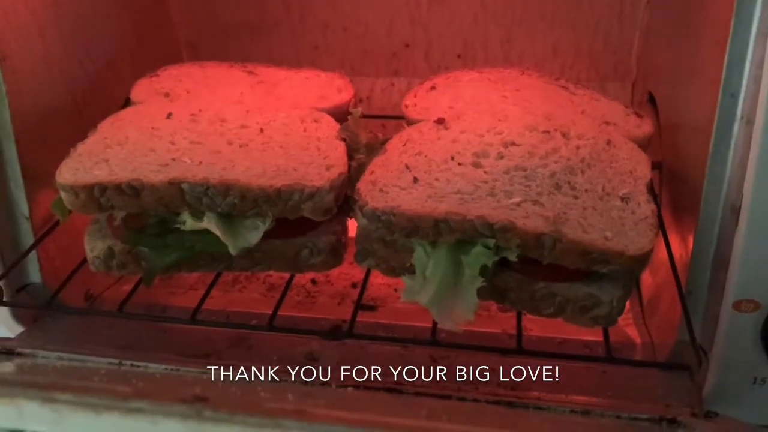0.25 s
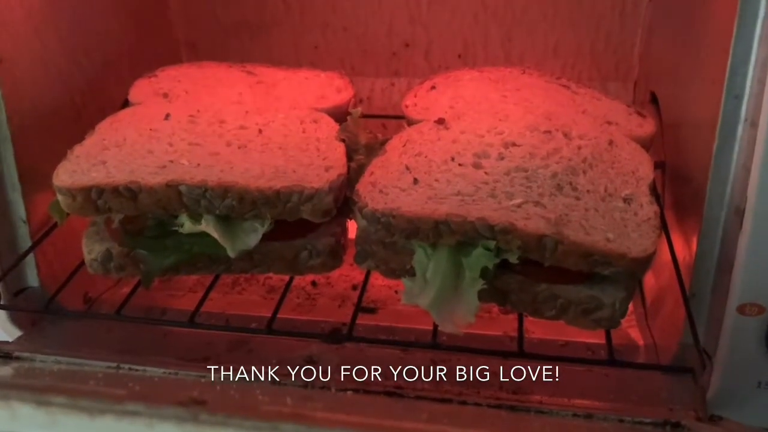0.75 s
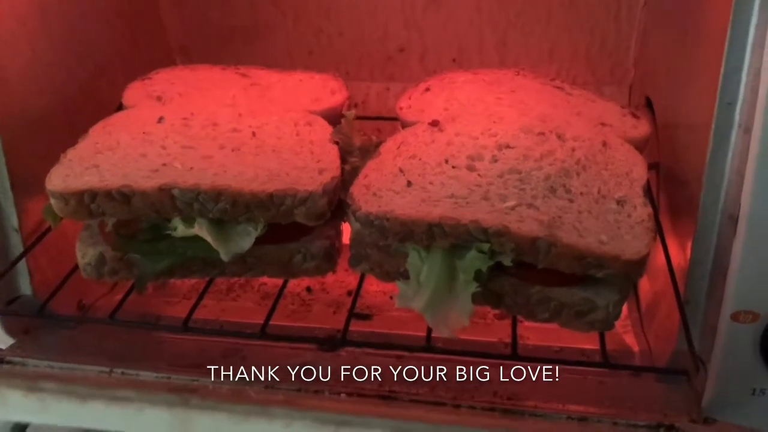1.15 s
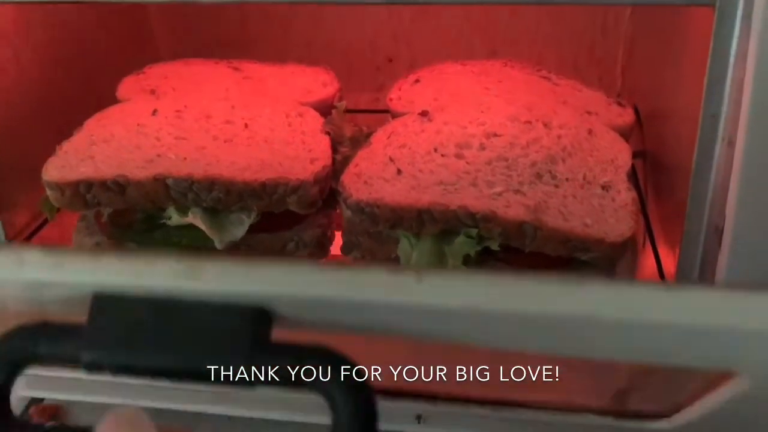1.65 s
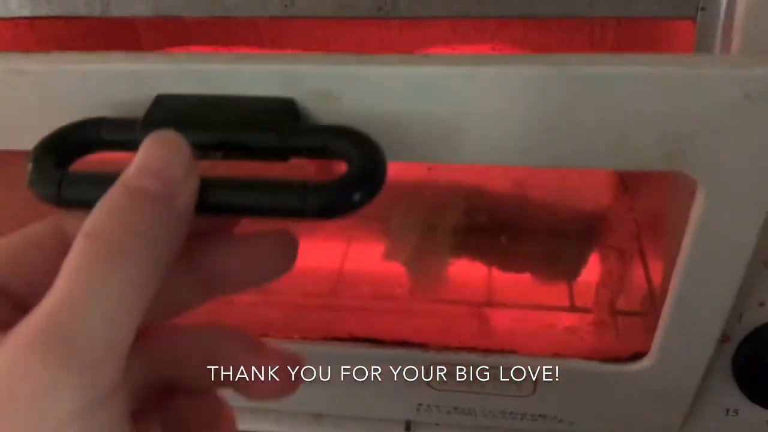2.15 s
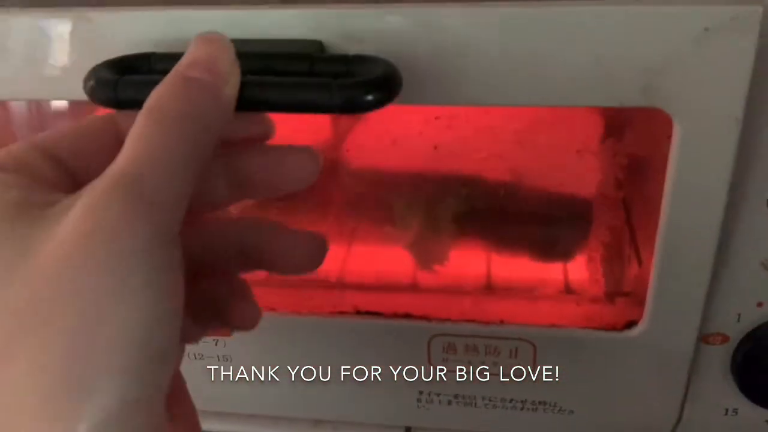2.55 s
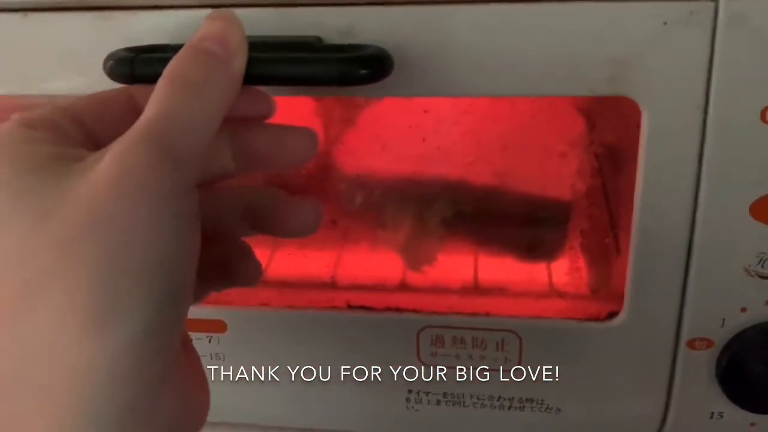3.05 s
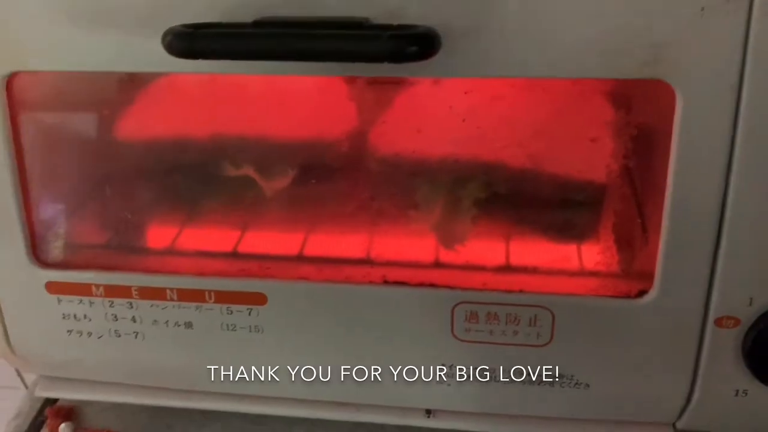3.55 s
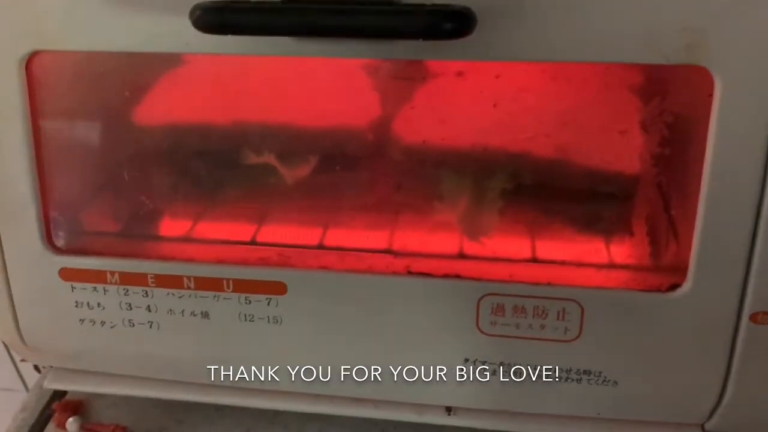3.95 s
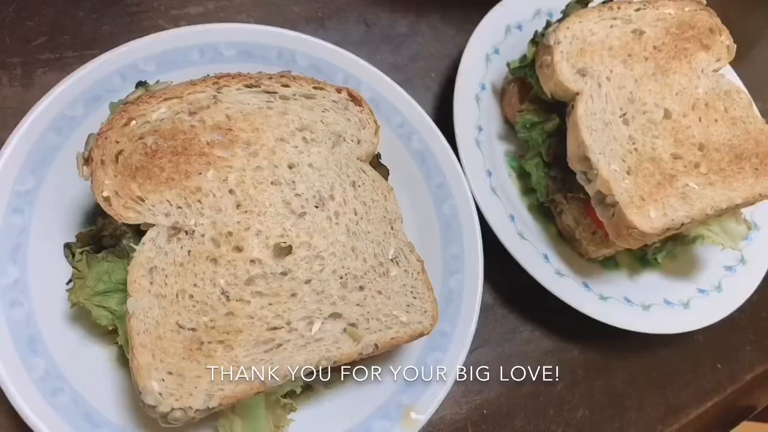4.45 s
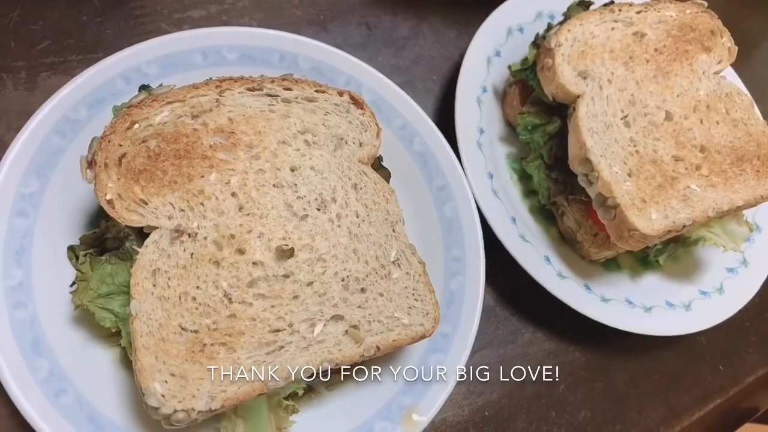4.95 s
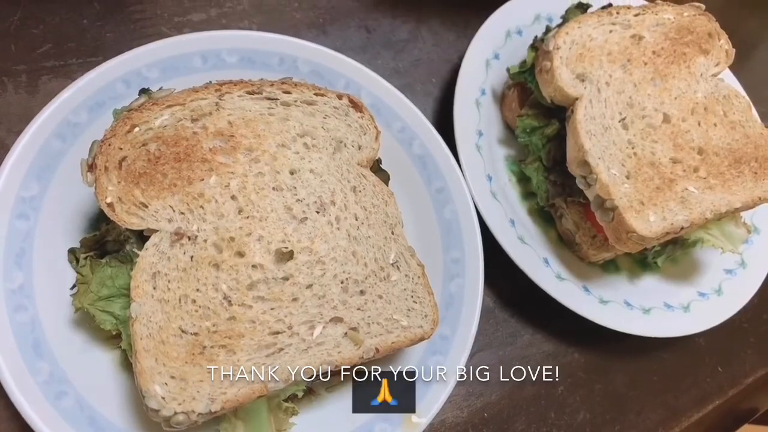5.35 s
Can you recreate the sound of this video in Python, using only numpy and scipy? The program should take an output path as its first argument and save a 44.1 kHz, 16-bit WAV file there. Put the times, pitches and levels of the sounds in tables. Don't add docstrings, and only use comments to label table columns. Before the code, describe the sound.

From the start, a wind-up timer ticks evenly inside a toaster oven, a beat about every 0.21 seconds. Each tick is a tiny cluster of hard contacts, bright and rattly, with a short tinny ring from the sheet-metal case; strong and weak beats alternate in colour. The close stereo pickup also holds soft low kitchen tone and a faint motor hum. A slight touch of the door comes near 2.8 s, then it shuts at 3.0 s with a dull bump, brief frame shudder and small knocks until 3.2 s. Ticking continues unchanged. A low, downward-gliding thud travels through the counter at 3.8 s, with a shorter one near 4.3 s. At 4.35 s everything cuts to a very brief silence, then a quiet mono dining room: low rumble, air, hiss settling lower. Distant crockery clinks at 4.55 and 4.75 s, with a tiny click, then a dull knock at 4.87 s; only room noise remains until about 5.6 s.

```python
import sys
import numpy as np
from scipy import signal
from scipy.fft import rfft, irfft, next_fast_len
from scipy.io import wavfile
from scipy.ndimage import uniform_filter1d

SR = 44100
rng = np.random.default_rng(int(sys.argv[2]) if len(sys.argv) > 2 else 0)


def ratio(d):
    e = np.asarray(d, float) / 20
    return 10 ** e


def transcribe(signal):
    frames = np.atleast_2d(signal).T
    limited = np.clip(frames, -1, 1)
    pcm = np.round(limited * 32767).astype(np.int16)
    wavfile.write(sys.argv[1], SR, pcm)


N = 246341
T = np.arange(N) / SR
KITCHEN_END_S, DINING_START_S = 4.3525, 4.3904

# t/s, peak level/dB, low body re peak/dB, treble re peak/dB
BEATS = [(0.003, -31.5, -11.5, -12), (0.2112, -32.5, -13, -9), (0.4223, -33.5, -11, -10),
         (0.634, -35, -11, -6), (0.8478, -35, -6, -12), (1.061, -35.5, -14.5, -6.5), (1.276, -32, -12, -10),
         (1.487, -34.5, -12, -4.5), (1.7, -30.5, -12.5, -13), (1.91, -32.5, -14, -7.5),
         (2.121, -34.5, -7.5, -12.5), (2.3315, -34, -11, -8.5), (2.5451, -33, -9, -17),
         (2.756, -34.5, -16, -8), (2.974, -32.5, -8, -10.5), (3.185, -34.5, -16.5, -3),
         (3.3953, -34.5, -8, -10.5), (3.606, -35.5, -12, -3), (3.8144, -35, -9.5, -15.5),
         (4.0256, -36, -11.5, -8), (4.2384, -33.5, -10.5, -13.5)]
BEAT_S, PEAK_DB, LOW_DB, TREBLE_DB = np.transpose(BEATS)
IS_WEAK = np.arange(len(BEAT_S)) % 2


def blow_db(hz):
    corners = np.log([1500, 5000, 9000, 13600])
    tilt = np.array([np.interp(np.log(hz), corners, [low, 0, 0, treble])
                     for low, treble in zip(LOW_DB, TREBLE_DB)])
    usual = np.where(IS_WEAK, np.mean(tilt[1::2]), np.mean(tilt[::2]))
    return PEAK_DB + tilt - usual


CONTACT_DB = [
    [2.5, -4.5, -1, -1, -2.5],
    [0.88, -4, -12.5, -16.5, -32],
]
CHATTER_S = [0.0085, 0.008]


def escapement():
    shape = (len(BEAT_S), 5)
    steps = [0, 0.3, 0.65, 1, 1.6] + rng.uniform(-0.12, 0.12, shape)
    contacts = BEAT_S[:, None] + 0.003 + np.array(CHATTER_S)[IS_WEAK, None] * steps
    spread_db = [0, 2.2, 2.2, 2.2, 2.2] * rng.standard_normal(shape)
    rebound = ratio(np.array(CONTACT_DB)[IS_WEAK] + spread_db)
    rebound /= np.sqrt(np.sum(rebound ** 2, axis=1, keepdims=True))
    return contacts, rebound


# f/Hz, level/dB per Hz
STRONG = [(300, -14), (420, -14), (560, -11), (800, -7.5), (1100, -13), (1700, -8), (2500, -11.5),
          (3300, -11.5), (4700, -18), (6500, -8), (9000, -7), (11500, -10), (14000, -4.5), (16200, -43.5)]
# f/Hz, level/dB per Hz
WEAK = [(300, -9.5), (420, -21.5), (560, -9), (800, -13.5), (1100, -18), (1700, -13.5), (2500, -17.5),
        (3300, -18), (4700, -23), (6500, -15), (9000, -13), (11500, -19), (14000, -10.5), (16200, -48)]
# f/Hz, t60/s
PANEL_T60 = [(300, 0.26), (800, 0.22), (2100, 0.22), (5500, 0.12), (9000, 0.073), (14600, 0.057)]
# lead t/s, level re beat/dB
UNLOCK = [(0.026, -26), (0.026, -23.5)]
LEAD_S, UNLOCK_DB = np.array(UNLOCK)[IS_WEAK].T


def panel_ringing(contacts, rebound):
    out = np.zeros((2, N))
    edges = 300 * 2 ** (np.arange(19) / 3)
    white = rng.standard_normal((2, 2, N))
    grit = ratio(2.22 * rms_one(band(rng.standard_normal(N), 31, 700)))
    for k, (low, high) in enumerate(zip(edges, np.minimum(edges[1:], 17000))):
        hz = np.sqrt(low * high)
        t60 = at_hz(PANEL_T60, hz)
        kind_db = np.where(IS_WEAK, at_hz(WEAK, hz) + 12, at_hz(STRONG, hz) + 9)
        level = ratio(blow_db(hz) + kind_db - 2.35 * (hz < 3000))
        level *= ratio(2.2 * rng.standard_normal(len(BEAT_S)))
        hits = train(contacts, level[:, None] * rebound)
        body = ratio(-7) * fade(hits, t60)
        body += ratio(-3.5) * fade(hits, 0.014)
        body += ratio(-23) * fade(hits, 2.54 * t60)
        slide_db = UNLOCK_DB - 17.5 * max(np.log2(hz / 6000), 0)
        slide = (level * ratio(slide_db))[1:]
        body += fade(train(BEAT_S[1:] - LEAD_S[1:], slide), 0.58)
        body += fade(train(BEAT_S[1:] - 0.004, level[1:] * ratio(-23.5)), 0.15)
        swell = np.exp(-2 * np.pi * 16 * (hz / 1000) ** 1.5 / SR)
        body = signal.lfilter([1 - swell], [1, -swell], body)
        first, second = band(white[k % 2], low, high)
        out += body * grit ** np.clip(hz / 8000, 0, 1) * paired(first, second, hz)
    return out


# f/Hz, strong-beat level/dB, weak-beat level/dB, t60/s
CASE_MODES = [(393.5, -24.5, -17.5, 0.55), (448, -15.5, -23, 0.43), (531.6, -10, -9.5, 0.19),
              (591, -18.5, -28, 0.64), (590, -22, -7.5, 0.35), (700, -34, -57, 0.49),
              (800, -22.5, -32, 0.45), (832.6, -10, -19.5, 0.31), (927, -29, -27, 0.81),
              (1046.6, -9, -9.5, 0.26), (1089.4, -9, -46, 0.36), (1192, -9, -13.5, 0.27),
              (1260, -9.5, -14, 0.33), (1190, -33, -42.5, 0.1), (1520, -55, -80, 0.13),
              (1640, -9.5, -12, 0.19), (1745, -27, -9, 0.27), (1747, -5, -30, 0.27), (1860, -21, -64, 0.37),
              (2145, -21, -10, 0.11), (2222, -6, -13, 0.21), (2280, -16, -60, 0.2), (2660, -39, -37, 0.6),
              (3170, -11, -13, .2), (3410, -33, -11, 0.19), (4600, -9, -13, 0.15), (6760, 2, 2.5, 0.028)]


def case_modes(contacts, rebound):
    out = np.zeros((2, N))
    times = np.column_stack([BEAT_S - LEAD_S + 0.0055, contacts])
    heights = np.column_stack([ratio(UNLOCK_DB + 3) * (BEAT_S > LEAD_S), rebound])

    def strike(level, hz, t60):
        uneven = rng.uniform(0.44, 1, level.shape) * rng.choice([-1, 1], level.shape)
        return ring(train(times, level * uneven), hz, t60)

    for hz, strong_db, weak_db, t60 in CASE_MODES:
        mode_db = np.where(IS_WEAK, weak_db, strong_db) - 9
        level = ratio(blow_db(hz) + mode_db)[:, None] * heights
        for twin_hz in hz * (1 + 0.01195 * np.array([-1, 1])):
            first, second = strike(level, twin_hz, t60), strike(level, twin_hz, t60)
            out += paired(first, second, hz)
    return out


def wheel_rings(contacts, rebound):
    out = np.zeros(N)
    for hz in 4800 * 3.2 ** rng.random(44):
        uneven_db = 6.7 * rng.standard_normal(len(BEAT_S))
        level = ratio(blow_db(hz) - 23.5 + uneven_db)[:, None] * rebound
        phase = rng.uniform(0, 7.94, level.shape)
        out += ring(train(contacts, level * np.cos(phase)), hz, 520 / hz)
    return out


def timer():
    contacts, rebound = escapement()
    out = panel_ringing(contacts, rebound) + case_modes(contacts, rebound)
    return out + wheel_rings(contacts, rebound)


# t/s, level/dB, rise/dB per s, hold/s, fall/dB per s
SHUDDER = [
    (2.773, -50.5, 189, .002, 108),
    (3.015, -33, 3000, 0.0022, 195),
    (3.123, -59, 402, 0.018, 250),
    (3.175, -48.5, 400, .035, 133),
]


def frame_shudder(grains):
    shake = np.zeros(N)
    for s, db, rise, hold, fall in SHUDDER:
        before = np.maximum(s - T, 0)
        after = np.maximum(T - s - hold, 0)
        shake += ratio(db - rise * before - fall * after)
    return ratio(-5.0) * shake * rms_one(band(band(grains, 81, 410), 109, 700))


# t/s, peak level/dB, lowest f/Hz, contact cut-off f/Hz
BUMPS = [
    (3.0087, -32.5, 870, 5900),
    (3.012, -26.5, 91, 626),
    (3.040, -37.5, 202, 920),
    (3.126, -44, 90, 700),
    (3.181, -40.5, 89, 600),
    (3.197, -48, 90, 800),
]
# f/Hz, level/dB, t60/s
DOOR_MODES = [(150, -4, 0.084), (212, -8, 0.13), (285, 6.5, 0.041), (342, -5.5, 0.076), (446, -9, 0.092),
              (556, -8.5, .12), (800, -11.5, 0.3), (859, -9, 0.29), (973, -5.5, 0.2), (1230, -4, 0.084),
              (1477, 7.5, 0.053), (1860, 10.5, 0.029), (1875, 1, 0.1), (2160, -2, 0.1), (3066, 2, 0.042),
              (4740, 1, .04)]


def door_bumps():
    out = np.zeros(N)
    rattle = band(rng.standard_normal(N), 310, 5900)
    for s, peak_db, low_hz, cut_hz in BUMPS:
        hit = train([s], ratio(peak_db))
        rings = (ratio(-2) * fade(hit, 0.034) + ratio(-20) * fade(hit, 0.7)) * rattle
        for hz, db, t60 in DOOR_MODES:
            height = ratio(db - 3.0 + rng.uniform(-3.5, 0.62)) * rng.choice([-1, 1])
            rings += ring(hit * height, hz, t60)
        out += band(rings, low_hz, cut_hz)
    return out


# t/s, peak level/dB, first f/Hz, last f/Hz, t60/s
THUDS = [
    (3.82, -41, 230, 60, 0.28),
    (4.267, -53, 208, 138, 0.19),
    (4.295, -43.5, 192, 150, 0.072),
]


def counter_thuds(grains):
    out = np.zeros(N)
    rough = 0.3 * rms_one(band(grains, 76, 520))
    for s, peak_db, first_hz, last_hz, t60 in THUDS:
        age = np.maximum(T - s, 0)
        started = T > s
        hz = last_hz + (first_hz - last_hz) * np.exp(-age / 0.0202)
        wave = np.sin(2 * np.pi * np.cumsum(hz * started) / SR) + rough
        out += ratio(peak_db - 60 * age / t60) * started * wave
    return out


def door():
    grains = rng.standard_normal(N) * (rng.random(N) < 1500 / SR)
    return frame_shudder(grains) + door_bumps() + counter_thuds(grains)


# t/s, peak level/dB
SNAPS = [
    (3.123, -61),
    (4.759, -48),
]


def snaps():
    s, db = np.transpose(SNAPS)
    return fade(train(s, ratio(db)), 0.03) * band(rng.standard_normal(N), 4500, 10600)


# f/Hz, level/dB per Hz
KITCHEN = [(20, -72), (32, -9), (50, 3.5), (130, 1.5), (250, -7.5), (450, -17.5), (800, -26), (1400, -25.5),
           (2500, -43.5), (4000, -51), (6000, -37.5), (9000, -42), (12000, -35.5), (14500, -50)]
# f/Hz, width/Hz, level/dB
MOTOR = [
    (86.76, 3.4, -60.5),
    (176.3, 18, -75.5),
]


def kitchen():
    first, second = coloured(KITCHEN, channels=2)
    dull = signal.butter(3, 8000, fs=SR, output="sos")
    second = signal.sosfilt(dull, second) + 0.087 * second
    tone = ratio(-62) * (first + 0.36 * second * [[1], [-1]])
    return tone + sum(ratio(db) * hum(hz, width_hz) for hz, width_hz, db in MOTOR)


# (f/Hz, level/dB, t60/s)
CLINKS = [
    (4.557, -45.5, 1300, [(970, -12, 0.12), (2120, -11.5, 0.29), (2145, -10, .34), (2660, -19, .4), (2700, -14, 0.17)]),
    (4.74, -53, 2800, [(1420, 1, 0.09), (1690, 3, .06), (2100, -8, .15), (2490, -3, 0.099)]),
    (4.761, -58, 2560, [(1455, 3, .35), (1510, 0, .35), (1780, -1, .3), (2000, -2, .1), (2220, 0, .1), (2420, 0, .1), (2750, -8, .08)]),
    (4.868, -51.5, 1500, [(420, 0, .1), (800, 0, .1), (1850, -9, .1)]),
]


def crockery():
    out = np.zeros(N)
    tail = band(rng.standard_normal(N), 270, 2800)
    for s, peak_db, top_hz, modes in CLINKS:
        hit = train([s], ratio(peak_db))
        out += sum(ring(hit * ratio(db), hz, t60) for hz, db, t60 in modes)
        out += ratio(9.0) * fade(hit, 0.31) * band(tail, 260, top_hz)
    return out


# t/s, level/dB
RUMBLE = [(4.39, -46.5), (4.438, -52), (4.476, -48), (4.562, -53), (4.62, -50), (5.11, -51.5), (5.218, -55),
          (5.286, -49), (5.586, -51.5)]
# f/Hz, level/dB per Hz
AIR = [(35, -26), (60, -17), (75, -6), (335, -11.5), (530, -22), (557, -21.5), (650, -21.5), (1060, -28.5),
       (1350, -29), (3500, -38.5), (4550, -69), (7700, -120)]
# f/Hz, level/dB per Hz
HISS = [(1500, -6.5), (2500, -6), (4400, -14), (6600, -10), (9000, -14.5), (12500, -24), (15600, -25),
        (16300, -52)]


def dining_room():
    rumble = ratio(np.interp(T, *np.transpose(RUMBLE))) * hum(46.9, width_hz=11.2)
    air = ratio(-54) * coloured(AIR, channels=1)[0]
    settle = np.exp(-np.maximum(T - DINING_START_S, 0) / 0.081)
    hiss = ratio(-65.5 + 7.5 * settle) * coloured(HISS, channels=1)[0]
    return rumble + air + hiss + crockery()


# f/Hz, share/0-1
LIKENESS = [(60, .9), (300, 0.7), (1000, 0.52), (3000, 0.16), (6000, 0.41), (9000, 1), (11600, 0.93),
            (14000, 1), (16200, 1)]


def paired(first, second, hz):
    alike = np.clip(at_hz(LIKENESS, hz), 0, 1)
    common = np.sqrt(1 + alike) * first
    opposed = np.sqrt(1 - alike) * second * [[1], [-1]]
    return (common + opposed) / np.sqrt(2)


# f/Hz, lag/rad
CHANNEL_LAG = [(0, 0), (690, .15), (1500, 1.5), (2750, 1.6), (4400, -.4), (5400, -3.4), (6700, -3.3),
               (9300, 0), (11250, 2.8), (12200, 3.4), (14000, 6.28), (15500, 8.6)]
# f/Hz, left re right/dB
CHANNEL_SHADE = [(60, -1), (180, -0.5), (550, 1), (1650, -1), (4970, -2.5), (15000, 1)]


def stereo_phase(x):
    size = next_fast_len(N + 999)
    hz = np.fft.rfftfreq(size, 1 / SR)
    shade = ratio(at_hz(CHANNEL_SHADE, np.maximum(hz, 1)) / 2)
    half = shade * np.exp(-0.5j * np.interp(hz, *np.transpose(CHANNEL_LAG)))
    return irfft(rfft(x, size) * [half, 1 / half], size)[:, :N]


def train(times, heights):
    clicks = np.full(N, 1e-18)
    index = np.round(np.asarray(times) * SR).astype(int)
    np.add.at(clicks, np.clip(index, 0, N - 1), heights)
    return clicks


def fade(clicks, t60):
    return signal.lfilter([1], [1, -ratio(-60 / (t60 * SR))], clicks)


def ring(clicks, hz, t60):
    r = ratio(-60 / (t60 * SR))
    w = 2 * np.pi * hz / SR
    return signal.lfilter([0, np.sin(w)], [1, -2 * r * np.cos(w), r * r], clicks)


def hum(hz, width_hz, steady=0.61):
    t60 = np.log(1000) / (np.pi * width_hz)
    once = ring(rng.standard_normal(N), hz, t60)
    x = rms_one(ring(rms_one(once), hz, t60))
    power = uniform_filter1d(x ** 2, size=int(2 * SR / hz))
    return rms_one(x / (power + 0.019) ** (steady / 2))


def coloured(spectrum, channels):
    hz = np.maximum(np.fft.rfftfreq(N, 1 / SR), 1)
    white = rng.standard_normal((channels, N))
    return rms_one(irfft(rfft(white) * ratio(at_hz(spectrum, hz)), N))


def band(x, low_hz, high_hz):
    return signal.sosfilt(signal.butter(2, [low_hz, high_hz], "band", fs=SR, output="sos"), x)


def at_hz(points, hz):
    f, value = np.transpose(points)
    return np.interp(np.log(hz), np.log(f), value)


def rms_one(x):
    return x / np.sqrt(np.mean(x ** 2) + 1e-20)


def scene():
    oven = stereo_phase(timer() + door() + kitchen())
    return oven * (T < KITCHEN_END_S) + dining_room() * (T >= DINING_START_S) + snaps()


def band_limit(x):
    return signal.sosfilt(signal.butter(12, 16790, fs=SR, output="sos"), x)


def record(dry):
    low_pass = signal.cheby2(10, 50, 16900, fs=SR, output="sos")
    mix = signal.sosfilt(low_pass, dry)
    return band_limit(mix)


dry = scene()
out = record(dry)
transcribe(out)
```